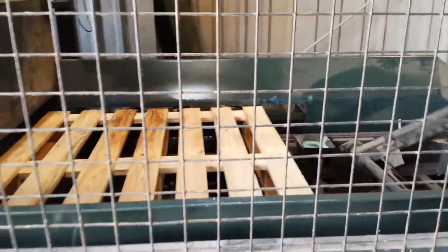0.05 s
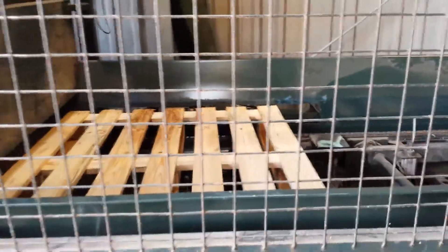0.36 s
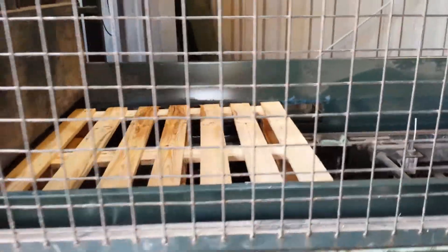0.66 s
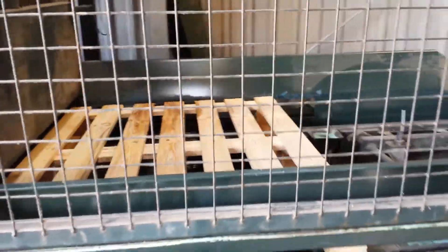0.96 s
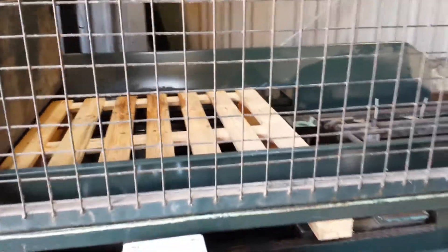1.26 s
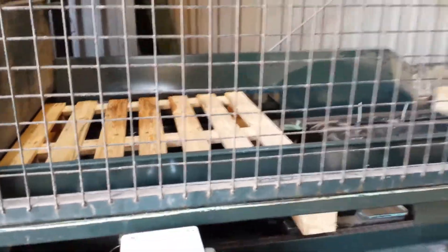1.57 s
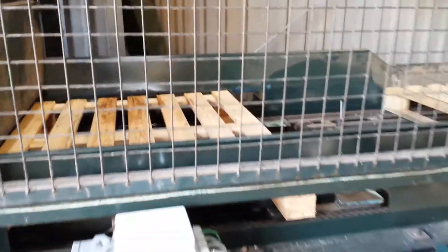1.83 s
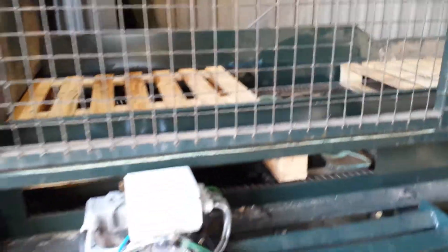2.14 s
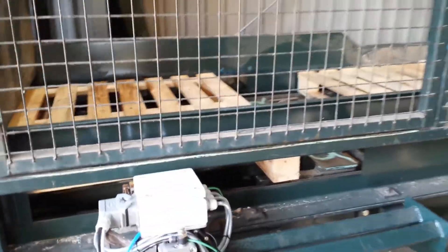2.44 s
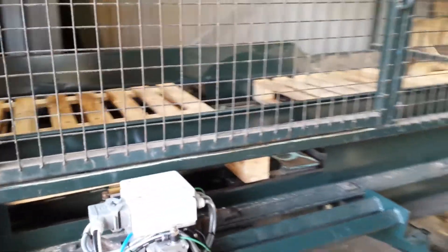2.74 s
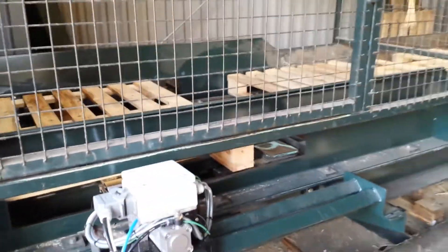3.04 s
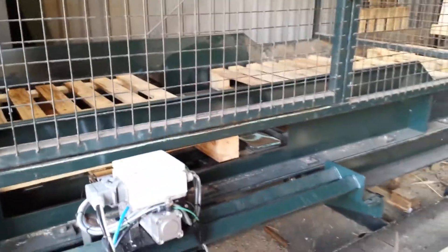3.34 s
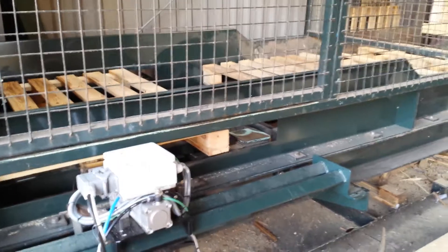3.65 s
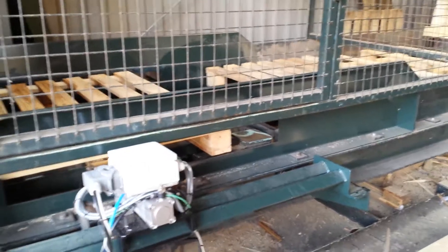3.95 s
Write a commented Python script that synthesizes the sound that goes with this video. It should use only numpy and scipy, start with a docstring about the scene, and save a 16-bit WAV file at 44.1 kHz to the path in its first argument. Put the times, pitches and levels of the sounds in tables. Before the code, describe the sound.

The constant roar and chain rattle of a pallet conveyor fills an echoing shed, heard almost entirely on the left. Two short air hisses come first, then nearby wooden clacks, steel clanks and two more distant crashes of sliding pallets.

```python
"""Beside a pallet conveyor in a large, echoing shed; nearly all the sound is on the left microphone.
A crash dies away into the steady roar of the line, with chain rattle and a faint motor hum.
In the first second air valves vent twice and boards start to clack close by. Further off, pallets
slide and crash down at about 1.1 s and 2.7 s, booming in the frame. Steel stops clank, loudest
just ahead of the last crash, and one more pallet starts to slide at the end."""
import sys
import numpy as np
from scipy import signal
from scipy.fft import rfft, irfft
from scipy.io import wavfile
from scipy.ndimage import uniform_filter1d, minimum_filter1d

SR = 44100
rng = np.random.default_rng(int(sys.argv[2]) if len(sys.argv) > 2 else 0)


def digitize_waveform(pressure):
    """Quantize a signal to 16-bit integers and store it at the path in sys.argv[1].

    Rows of a 2-D input are taken as channels; values are limited to [-1, 1].
    """
    field = np.atleast_2d(pressure).T
    bounded = np.clip(field, -1, 1)
    quanta = np.round(bounded * 32767).astype(np.int16)
    wavfile.write(sys.argv[1], SR, quanta)


N = 176400
TIME_S, FREQ_HZ = np.arange(N) / SR, np.fft.rfftfreq(N, 1 / SR)


def amp(db):
    """Decibels to gain."""
    return 10 ** (np.asarray(db) / 20)


def unit(x):
    """Scales to rms 1."""
    return x / np.sqrt(np.mean(x ** 2) + 1e-20)


def read(points, hz):
    """Reads a table on a log-frequency axis."""
    f, value = np.transpose(points)
    return np.interp(np.log(hz + 1), np.log(f + 1), value)


def colour(x, points):
    """Filters by a spectrum table."""
    return irfft(rfft(x, 2 * N) * amp(read(points, np.fft.rfftfreq(2 * N, 1 / SR))))[:N]


def wander(rate_hz):
    """Smooth random drift of rms 1."""
    return unit(irfft(rfft(rng.standard_normal(N)) * np.exp(-(FREQ_HZ / rate_hz) ** 2), N))


def clicks(per_s, spread_db):
    """Tiny impacts at random times; spread_db makes their sizes uneven."""
    size = amp(spread_db * np.minimum(rng.exponential(1, N), 4))
    return unit(size * rng.choice([-1., 1.], N) * (rng.random(N) < per_s / SR))


def envelope(start, rise_s, hold_s, fall_s):
    """Straight rise, hold (counted from the start), exponential release."""
    t = TIME_S - start
    return np.clip(t / rise_s, 0, 1) * np.exp(-np.maximum(t - hold_s, 0) / fall_s)


def blow(start, rise_s, fall_db_per_s):
    """Quick rise and a steady fall in dB."""
    t = TIME_S - start
    return np.clip(t / rise_s, 0, 1) * amp(-fall_db_per_s * np.maximum(t - rise_s, 0))


def ring(strikes, modes, rise_s):
    """Each strike rings a set of dying modes at its own pitch."""
    out = np.zeros(N)
    for start, db, hz in strikes:
        t = np.maximum(TIME_S - start, 0)
        tone = sum(amp(db + mode_db - 60 * t / t60) * np.sin(2 * np.pi * hz * ratio * t)
                   for ratio, mode_db, t60 in modes)
        out += np.minimum(t / rise_s, 1) * tone
    return out


def shed(x):
    """Diffuse echo of the shed, whose treble dies first."""
    # reverberation time: frequency_hz, t60_s
    decay = [(150, 1.0), (1000, 0.51), (4000, 0.49), (9000, 0.22)]
    hz, t, noise = signal.stft(rng.standard_normal(SR), SR, nperseg=256)
    tail = signal.istft(noise * amp(-60 * t / read(decay, hz)[:, None]), SR, nperseg=256)[1]
    return signal.fftconvolve(x, tail / np.linalg.norm(tail))[:N]


def right_channel(left):
    """The almost dead side: a weak, partly blurred copy of the left over faint hiss."""
    # part that follows the left directly: frequency_hz, share
    direct_share = [(30, .2), (120, 0.95), (250, 0.8), (600, 0.85), (1200, 0.2), (2500, 0.2), (8000, 0)]
    # right against left: frequency_hz, gain_db
    leak_gain = [(30, -21), (70, -36), (200, -37), (600, -40.5), (1200, -40), (2300, -38), (4200, -53.5),
                 (8000, -31)]
    # hiss: frequency_hz, level_db
    hiss = [(30, 24), (200, 14.5), (2000, 9), (7000, -9), (13000, -4)]
    direct = read(direct_share, FREQ_HZ)
    leak = irfft(direct * rfft(left) + np.sqrt(1 - direct ** 2) * rfft(shed(left)), N)
    return colour(leak, leak_gain) + amp(-66) * unit(colour(rng.standard_normal(N), hiss))


def right_click(start_s=.1774, peak=.016, width_s=.00012):
    """A lone, faint click in the right channel."""
    u = (TIME_S - start_s) / width_s
    return peak * (1 - 2 * u ** 2) * np.exp(-u ** 2)


def roar():
    """Many distant machines blurred by the shed, with drifting patches of colour."""
    # roar of the line: frequency_hz, level_db
    spectrum = [(15, -73), (25, -41), (155, -6.5), (197, -9.5), (213, -3.5), (363, -3), (403, -8.5),
                (448, -6.5), (584, -8), (684, -6.5), (892, -10.5), (1560, -10.5), (2940, -7.5),
                (3180, -7.5), (4030, -6.5), (4730, -11.5), (14000, -89.5)]
    patch_db, flicker_db = 0.7, 1
    noise = signal.stft(rng.standard_normal(N), nperseg=512)[2]
    patches = uniform_filter1d(rng.standard_normal(noise.shape), size=7, axis=0)
    patches = unit(uniform_filter1d(patches, size=14, axis=1))
    wash = signal.istft(noise * amp(patch_db * patches))[1][:N]
    return amp(-29.5 + flicker_db * wander(25)) * unit(colour(wash, spectrum))


def motor_hum(waver_hz=4, growth_db_per_s=1.5):
    """Faint drive tones waver in level and phase and slowly grow louder."""
    # motor tones: pitch_hz, final_level_db
    tones = [(274, -50), (446.8, -55), (672, -46), (1311, -50), (2630, -51)]
    hum = np.zeros(N)
    for hz, db in tones:
        swell = 1 + .5 * wander(waver_hz)
        hum += amp(db) * unit(swell * np.cos(2 * np.pi * hz * TIME_S + wander(waver_hz)))
    return hum * amp(growth_db_per_s * (TIME_S - TIME_S[-1]))


def chain_ticks():
    """Chain links tick at random and echo round the shed."""
    # ticking links: frequency_hz, level_db
    spectrum = [(200, -43), (900, 12), (2500, 8.5), (4200, 4), (5300, 12), (6500, 7.5), (7600, -1),
                (8600, -59), (14000, -53)]
    ticks = colour(clicks(per_s=170, spread_db=-1.5), spectrum)
    return amp(-44) * unit(ticks + shed(ticks))


def chain_fizz(flicker_db=3):
    """Chain links rub and rattle in uneven flurries of fine grains."""
    # flurries, fading as the microphone moves on: time_s, level_db
    flurries = [(0, -58), (.3, -52.5), (.72, -57.5), (1.0, -56), (1.5, -49.5), (1.85, -63.5), (2.3, -64.5),
                (2.6, -53), (2.95, -93.5), (4, -63.5)]
    # fine rattle: frequency_hz, level_db
    spectrum = [(3000, -11), (7000, 0.5), (8000, -5.5), (9000, -8.5), (10300, -11.5), (12000, -24),
                (14000, -45.5)]
    level_db = np.interp(TIME_S, *np.transpose(flurries)) + flicker_db * wander(25)
    return amp(level_db) * unit(colour(clicks(per_s=5000, spread_db=1), spectrum))


def vents(sputter_db=1.4):
    """Valves let out soft, sputtering puffs of compressed air."""
    # puffs: start_s, level_db, hold_s
    puffs = [(.305, -25, .085), (.808, -25, .1)]
    # escaping air: frequency_hz, level_db
    air = [(500, -24), (2000, -9), (4200, 0), (5300, -8), (6500, -13), (8500, -19.5), (10500, -26),
           (12200, -33), (14000, -70)]
    flow = sum(amp(db) * envelope(start, .055, hold, .13) ** 2 for start, db, hold in puffs)
    return flow * amp(sputter_db * wander(45)) * unit(colour(rng.standard_normal(N), air))


def slides(flicker_db=.5):
    """Dense stick and slip of wood dragged over steel, some way off."""
    # sliding pallets: start_s, end_s, level_db, rise_s, release_s, tilt_db_per_octave
    drags = [(-.1, 0.017, -28, .05, 0.23, 2.5), (0.91, 1.53, -27.5, 0.12, 0.22, 0.5),
             (2.194, 2.402, -29.5, 0.11, 0.034, -0.5), (2.371, 2.656, -22.5, 0.12, 0.16, -1),
             (3.64, 4.05, -29.5, 0.26, 0.11, -2.5)]
    # scraping wood: frequency_hz, level_db
    spectrum = [(40, -30), (100, -10.5), (290, 6.5), (520, 4), (1000, 4.5), (2200, 6), (4200, 9.5),
                (5600, 0.5), (8000, -20.5), (14000, -113)]
    scrape = rfft(colour(clicks(per_s=6000, spread_db=0), spectrum))
    octave = np.log2(FREQ_HZ + 1)
    out = np.zeros(N)
    for start, end, db, rise, fall, tilt in drags:
        tilted = unit(irfft(scrape * amp(tilt * octave), N))
        out += amp(db) * envelope(start, rise, end - start, fall) * tilted
    return out * amp(flicker_db * wander(20))


def thuds(rise_s=0.0073, low_cut_hz=62):
    """The conveyor frame booms briefly under a load."""
    # loads landing: start_s, level_db, hold_s, release_s, upper_edge_hz
    loads = [(-.02, -31.5, 0.023, 0.17, 323), (1.12, -32, 0.18, 0.072, 130),
             (1.288, -31.5, 0.081, 0.0062, 526), (1.508, -35, 0.038, 0.039, 300),
             (2.68, -28, 0.087, 0.055, 453), (2.887, -34, 0.055, 0.13, 517)]
    # boom of the frame: frequency_hz, level_db
    spectrum = [(30, -40), (50, -19), (75, -2), (130, 4), (200, 5.5), (300, 15), (600, 1.5), (6000, -63)]
    boom = rfft(colour(rng.standard_normal(N), spectrum))
    out = np.zeros(N)
    for start, db, hold, fall, edge_hz in loads:
        dulled = unit(irfft(boom / (1 + (FREQ_HZ / edge_hz) ** 2), N))
        out += amp(db) * envelope(start, rise_s, hold, fall) * dulled
    return irfft(rfft(out) / np.sqrt(1 + (low_cut_hz / (FREQ_HZ + 1)) ** 20), N)


def bumps(t60_s=.14, low_cut_hz=60):
    """A dropped load gives the frame a short, deep push."""
    # heavy drops: start_s, level_db, pitch_hz
    drops = [(1.16, -17.5, 83.5), (1.295, -28, 135), (2.712, -31, 105.6)]
    push = ring(drops, [(1, 0.0074, t60_s)], rise_s=.02)
    return signal.sosfilt(signal.butter(3, low_cut_hz, "high", fs=SR, output="sos"), push)


def crashes(track_lag_s=.04, track_fall_share=.8, track_edge_hz=4500):
    """Further off, a clatter of boards dies away; the steel track swells later and rings on."""
    # pallets crashing down: start_s, level_db, rise_s, fall_db_per_s
    landings = [(-.015, -22, 0.038, 124), (1.135, -21, 0.028, 74), (2.727, -18.5, 0.03, 56),
                (2.85, -31.5, 0.046, 71.5)]
    # tumbling boards: frequency_hz, level_db
    clatter = [(60, -39), (150, 6), (270, -1), (550, -1), (1000, 2), (1550, 4), (2100, 3), (2750, 2.5),
               (4000, -1), (5500, -19), (8000, -42), (14000, -100)]
    # modes of the steel track: pitch_hz, level_db, t60_s
    track_modes = [(654, -6, 0.18), (937, -4.5, 0.081), (1144, -5.5, 0.087), (1530, 3.5, 0.09),
                   (1724, 7, 0.094), (2530, -1, 0.17), (2910, -10, 0.079)]
    t = np.arange(SR // 4) / SR
    ringing = sum(amp(db) * unit(amp(-60 * t / t60) * np.sin(2 * np.pi * hz * t))
                  for hz, db, t60 in track_modes)
    ringing = signal.sosfilt(signal.butter(6, track_edge_hz, fs=SR, output="sos"), ringing)
    contacts = clicks(per_s=7000, spread_db=0.5)
    boards = unit(colour(contacts, clatter))
    track = amp(-8.5) * unit(signal.fftconvolve(contacts, ringing)[:N])
    out = np.zeros(N)
    for start, db, rise, fall in landings:
        out += amp(db) * blow(start, rise, fall) * boards
        out += amp(db) * blow(start, rise + track_lag_s, fall * track_fall_share) * track
    return out


def clacks(skirt_db=-12, echo_db=-3.5):
    """Close by, each short flurry of contacts rings one broad resonance of a board."""
    # boards clacking: start_s, level_db, centre_hz, width_octaves, contact_s
    hits = [(0.436, -27, 1330, 0.79, 0.017), (0.503, -25, 3320, 0.24, 0.026),
            (0.509, -26.5, 1280, 0.66, 0.016), (0.542, -23, 2650, 1.1, 0.013),
            (0.595, -27.5, 1180, 0.39, 0.0071), (0.67, -31, 4130, 2.7, 0.021),
            (0.729, -28, 4640, 1.7, 0.015), (0.739, -20, 4520, 0.87, 0.0095),
            (0.896, -28, 1220, 2.1, 0.059), (1.007, -24, 3120, 0.31, 0.0077),
            (1.05, -17, 3830, 0.55, 0.0064), (1.142, -27.5, 2660, 0.37, 0.032),
            (1.226, -21, 4560, 1.1, 0.017), (1.385, -20, 4340, 0.39, 0.01),
            (1.402, -23, 4300, 0.39, 0.0027), (1.491, -24, 4020, 0.52, 0.008),
            (1.556, -30, 2130, 0.71, 0.026), (1.658, -24.5, 3240, 1.1, 0.011),
            (2.246, -30, 2250, 1.2, 0.021), (2.39, -21, 3380, 0.94, 0.0093),
            (2.628, -22, 3870, 0.16, 0.0091), (2.694, -20.5, 1030, 0.79, 0.0051),
            (2.734, -20, 3260, 1.5, 0.035), (3.441, -26.5, 1900, 0.88, 0.024)]
    # struck board: frequency_hz, level_db
    spectrum = [(60, -23), (300, 16.5), (1000, 8), (4400, 13), (6200, 1), (9000, -25), (14000, -40)]
    wood = amp(read(spectrum, FREQ_HZ))
    out = np.zeros(N)
    for start, db, hz, octaves, length in hits:
        resonance = np.exp(-.5 * (np.log2((FREQ_HZ + 1) / hz) / octaves) ** 2)
        body = wood * (resonance + amp(skirt_db))
        contacts = clicks(per_s=4000, spread_db=0.48) * envelope(start, 0.0003, length, fall_s=0.0017)
        hit = irfft(rfft(contacts) * body, N)
        out += amp(db) * unit(hit) * np.sqrt(length * SR / N)  # energy grows with contact time
    return out + amp(echo_db) * shed(out)


def clanks_and_knocks(rise_s=.0006, echo_db=-5.5):
    """Sharp strikes on steel stops and hollow knocks on wooden pallet blocks, with their echo."""
    # stops struck: start_s, level_db, pitch_hz
    clanks = [(1.391, -11, 4260), (1.491, -15, 3300), (2.3873, -4.5, 3210), (3.4462, -11.5, 3410)]
    # modes of a stop: pitch_ratio, level_db, t60_s
    stop_modes = [(0.528, -15, .04), (.86, -9, 0.04), (1.002, 0, .022), (1.091, -4, .04)]
    # blocks knocked: start_s, level_db, pitch_hz
    knocks = [(.439, -17, 943), (.4455, -15, 910), (.545, -23, 1180), (1.236, -17.5, 1020),
              (1.307, -24, 880), (1.35, -21, 690), (2.693, -14, 970), (2.772, -19, 814), (2.792, -14, 1030)]
    # modes of a block: pitch_ratio, level_db, t60_s
    block_modes = [(.74, -16, 0.011), (1.002, -3, 0.025), (1.24, -0.5, 0.021), (1.49, 2, 0.014),
                   (1.87, -7, 0.022)]
    out = ring(clanks, stop_modes, rise_s) + ring(knocks, block_modes, rise_s)
    return out + amp(echo_db) * shed(out)


def scene():
    """The whole line reaches the left microphone; the right is almost dead."""
    machinery = roar() + motor_hum() + chain_ticks() + chain_fizz()
    pallets = clacks() + clanks_and_knocks() + crashes() + thuds() + bumps() + slides()
    left = 2 * (machinery + pallets + vents())
    return np.array([left, right_channel(left) + right_click()])


def record(dry):
    """A fast limiter holds the peaks under full scale; a low-pass then cuts the top treble."""
    ceiling, edge_hz = .97, 14400
    needed_gain = np.minimum(1, ceiling / (abs(dry).max(0) + 1e-9))
    gain = uniform_filter1d(minimum_filter1d(needed_gain, size=129), size=129)
    low_pass = signal.firwin(511, edge_hz, window=("kaiser", 9), fs=SR)
    return signal.oaconvolve(dry * gain, low_pass[None], "same")


dry = scene()
out = record(dry)
digitize_waveform(out)
```